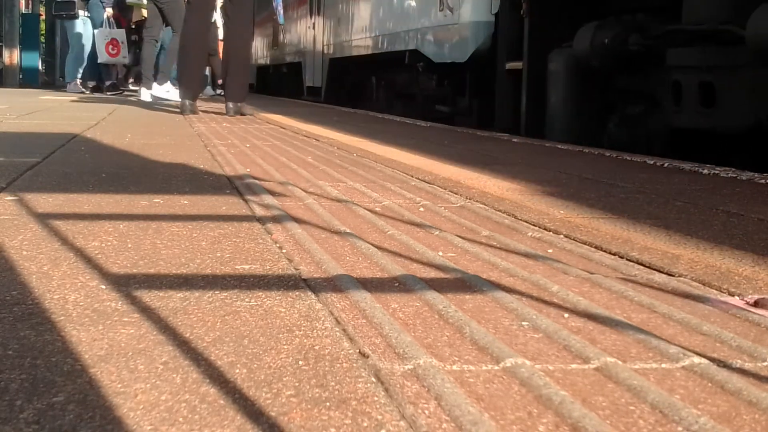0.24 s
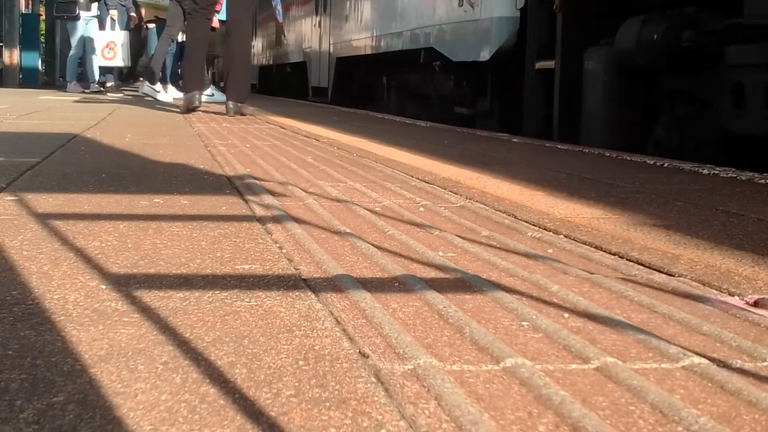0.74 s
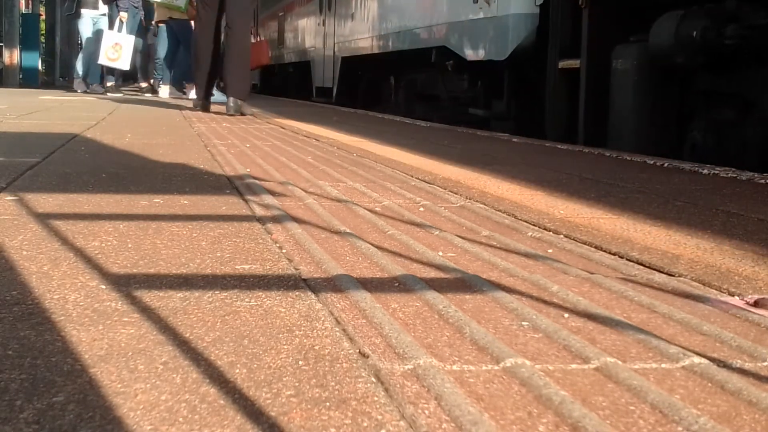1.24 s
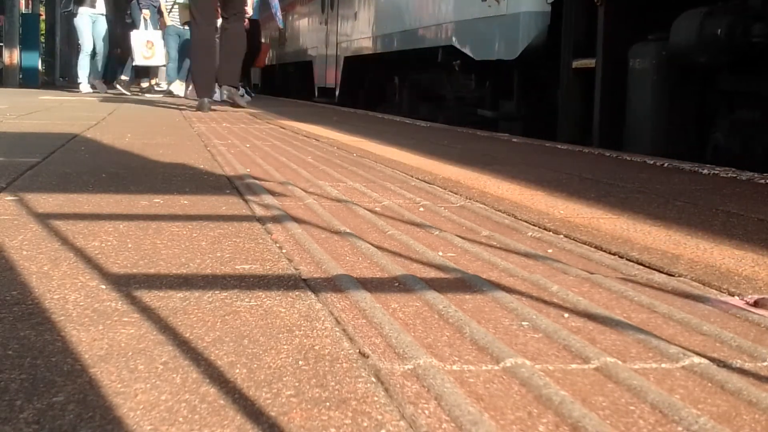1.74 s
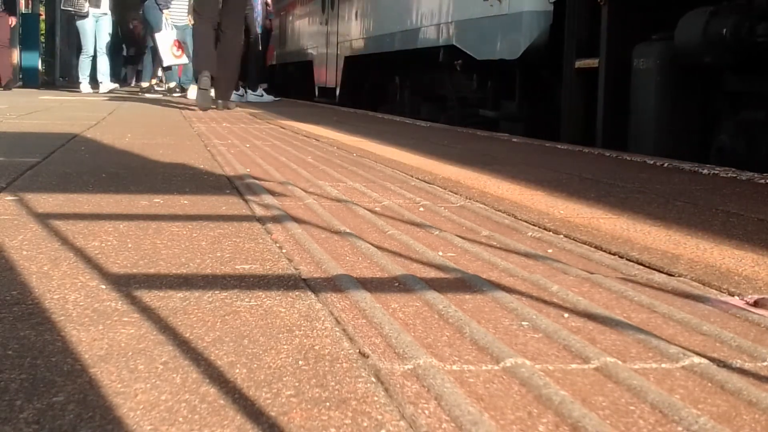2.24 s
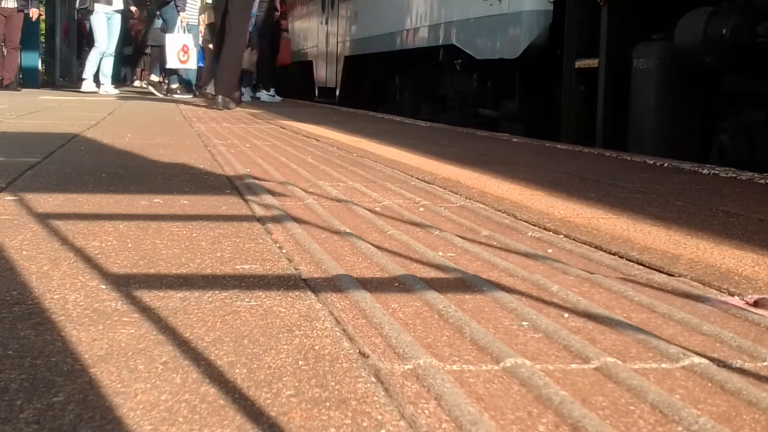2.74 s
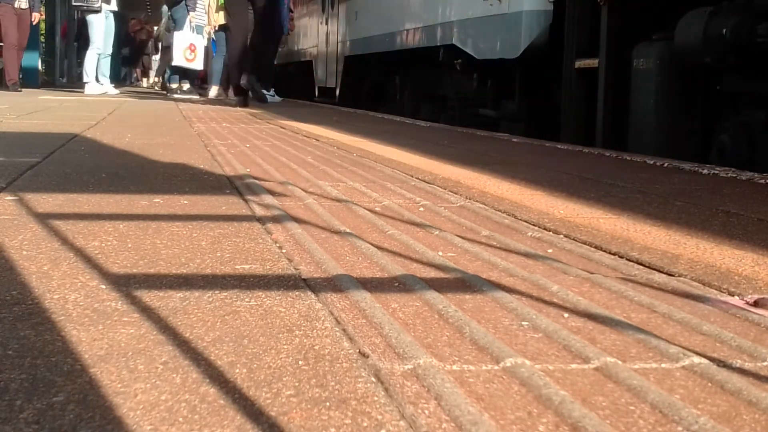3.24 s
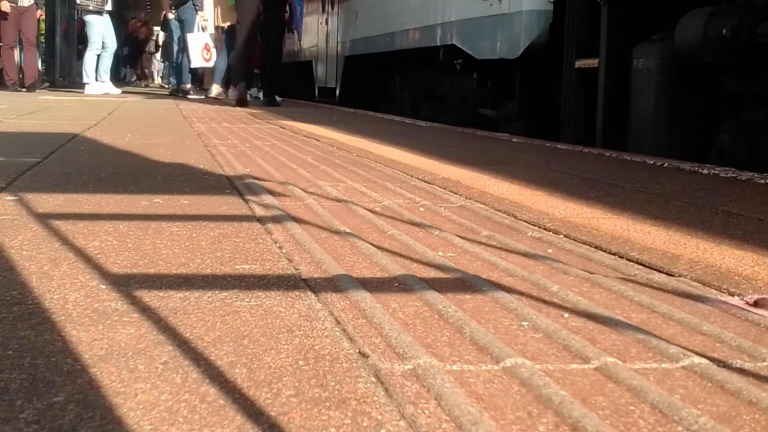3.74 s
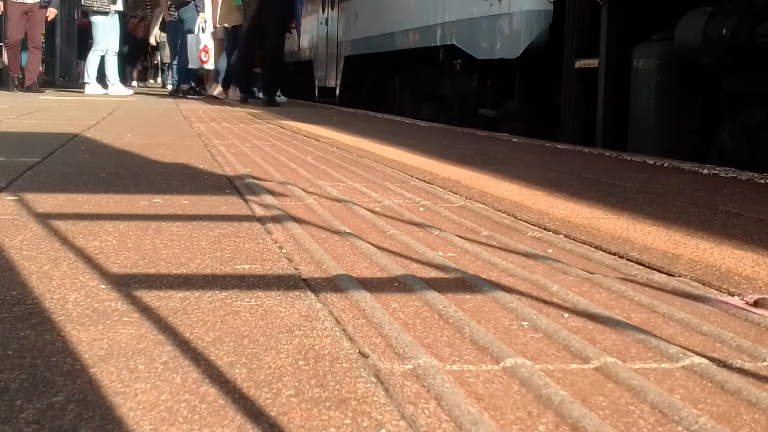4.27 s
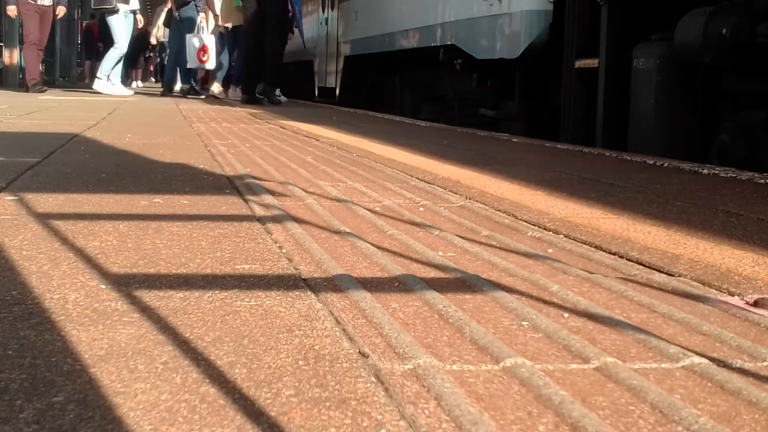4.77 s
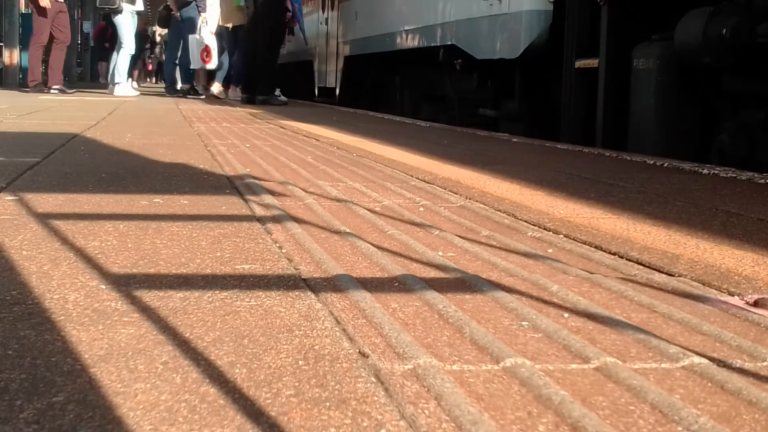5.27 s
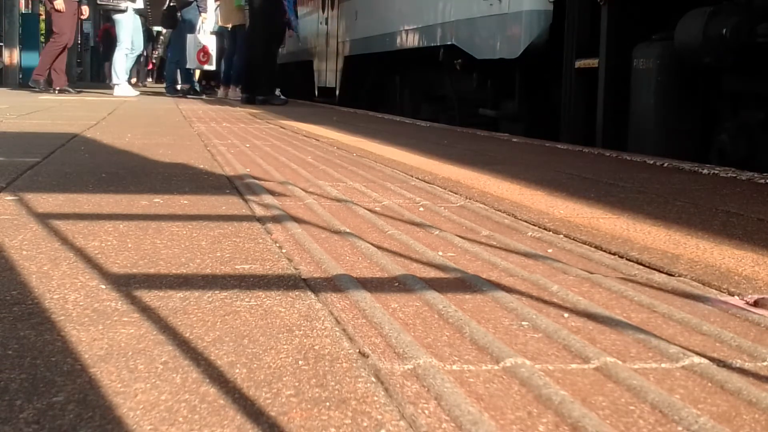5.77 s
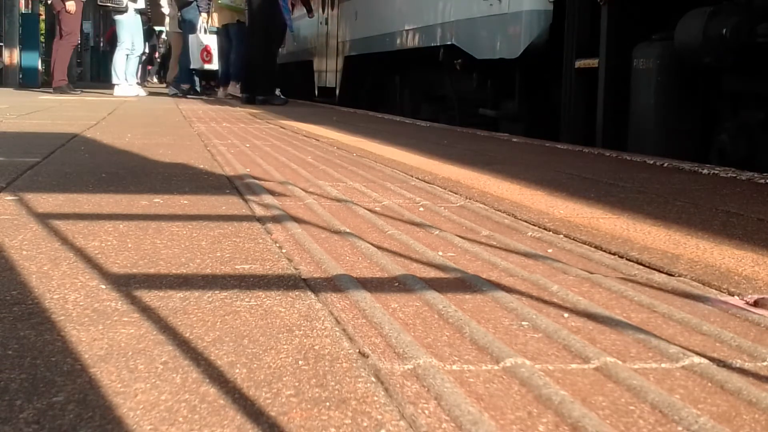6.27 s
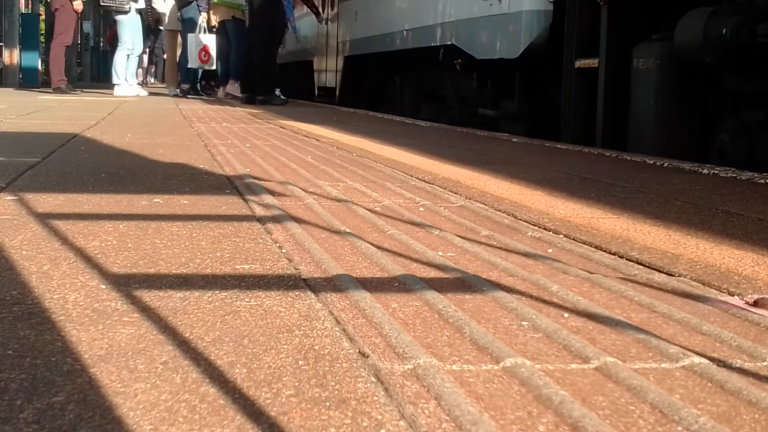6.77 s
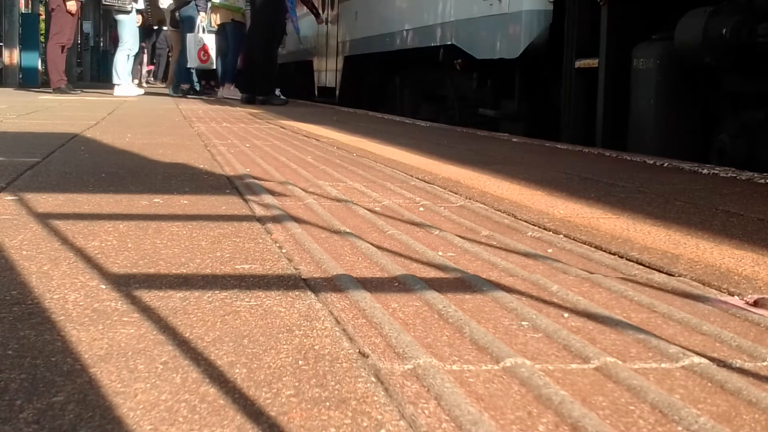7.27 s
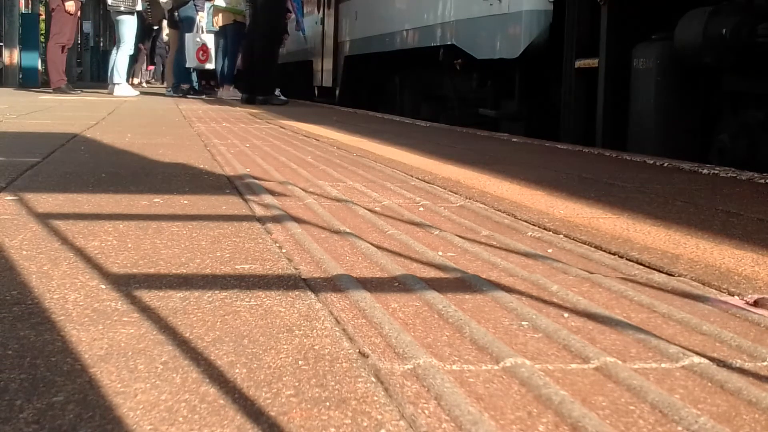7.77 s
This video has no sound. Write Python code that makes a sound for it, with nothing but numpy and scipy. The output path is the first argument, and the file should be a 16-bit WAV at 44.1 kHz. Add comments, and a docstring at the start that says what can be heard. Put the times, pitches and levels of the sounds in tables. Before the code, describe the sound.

Small dry rubs, chirps and low hoots open over the dulled idle of a diesel engine beside a platform. The mechanical rattle opens up, a few last squeaks pass, then the engine swells into a dense, steady roar with low throb, constant whine, metallic clatter, wavering panel buzz and thin leaking-air hiss. No footsteps stand out. The microphone stays still near the ground, and the engine drone runs on to the end.

```python
"""Short squeaks and scuffs come first, over the muffled idle of a diesel train at a station platform.
One shaft angle paces the exhaust throb, the rattle and the fan: sines and repeating noise locked to it.
The rattle clears after about a second; the sound grows louder after two seconds and stays loud.
Loose panels buzz in turn as wavering tones; leaking air hisses and whistles as shaped noise."""
import sys
import numpy as np
from scipy.fft import rfft, irfft, next_fast_len
from scipy.io import wavfile
from scipy.ndimage import map_coordinates

SR = 44100
rng = np.random.default_rng(int(sys.argv[2]) if len(sys.argv) > 2 else 0)


def unload_wav(signal):
    """Save mono or channel-first audio to the path in sys.argv[1] as 16-bit WAV at rate SR, clipped to [-1, 1]."""
    wavfile.write(
        sys.argv[1],
        SR,
        np.round(np.clip(np.atleast_2d(signal).T, -1, 1) * 32767).astype(np.int16),
    )


N = 353241  # length in samples
TOP_HZ = 15750  # nothing sounds above this
BLADE_ORDER = 79  # cycles of fan whine in one shaft turn


def amp(db):
    """Turn dB into a gain."""
    return 10 ** (np.asarray(db) / 20)


def unit(x):
    """Scale to rms 1."""
    return x / np.sqrt(np.mean(x ** 2) + 1e-20)


def along(points, hz):
    """Read a value between (Hz, value) points on a log frequency axis."""
    point_hz, value = np.transpose(points)
    return np.interp(np.log(hz + 1), np.log(point_hz + 1), value)


def curve(rows):
    """Join (seconds, value) points into one value per sample."""
    s, value = np.transpose(rows)
    return np.interp(np.arange(N) / SR, s, value)


def swells(rows):
    """Smooth rises and dips, each (middle s, length s, dB), as one level curve in dB."""
    t = np.arange(N) / SR
    return sum(db * np.exp(-(2 * (t - s) / length) ** 2) for s, length, db in rows)


def ramp(at_s, length_s):
    """A smooth step from 0 to 1 around at_s."""
    return .5 + .5 * np.tanh(2 * (np.arange(N) / SR - at_s) / length_s)


def wobble(rate):
    """A smooth random curve through this many random values a second."""
    knots = rng.standard_normal(int(N * rate / SR) + 4)
    return map_coordinates(knots, [np.arange(N) * rate / SR])


def filtered(x, response):
    """Weight each frequency of x by a response."""
    m = next_fast_len(N + SR // 2)
    return irfft(rfft(x, m) * response(np.fft.rfftfreq(m, 1 / SR)), m)[:N]


def noise(spectrum):
    """Steady noise with the given dB per Hz."""
    return filtered(rng.standard_normal(N), lambda hz: amp(along(spectrum, hz)) * np.sqrt(SR / 2))


def narrow(centre_hz, width_hz, size=N):
    """Noise of rms 1 through one resonance; width_hz is its half width."""
    m = next_fast_len(size)
    peak = 1 / (1 + ((np.fft.rfftfreq(m, 1 / SR) - centre_hz) / width_hz) ** 2)
    return unit(irfft(rfft(rng.standard_normal(m)) * peak, m)[:size])


def accent(turns, place, width, db):
    """A gain of rms 1 that rises once in each turn; place and width are parts of a turn."""
    away = (turns - place + .5) % 1 - .5
    return unit(amp(db * np.exp(-(2 * away / width) ** 2)))


def beats(turns, depth, orders):
    """Loudness pulsing of rms 1 at some multiples of the shaft speed."""
    pulses = sum(np.cos(2 * np.pi * (k * turns + rng.random())) for k in orders)
    return unit(np.exp(depth * pulses))


def lines(orders, turns, drift_db, slip=0):
    """Sines locked to the shaft, drifting slowly in level and slipping in phase by parts of a cycle."""
    def drift(row):
        return np.interp(np.arange(N), np.linspace(0, N, len(row)), row)

    out = np.zeros(N)
    for order, db in orders:
        level, play = rng.standard_normal((2, 20))
        cycles = order * turns + drift(slip * play) + rng.random()
        out += drift(amp(db + drift_db * level)) * np.sin(2 * np.pi * cycles)
    return np.sqrt(2) * out


def repeating(spectrum, turns, scatter_db, size=32768):
    """A rattle that comes back alike on every shaft turn: a dense comb of uneven lines."""
    shaft_hz = turns[-1] * SR / N
    hz = np.arange(size // 2 + 1) * shaft_hz
    uneven = unit(amp(scatter_db * rng.standard_normal(len(hz))))
    strength = amp(along(spectrum, hz)) * uneven * (hz < TOP_HZ)
    random_phase = np.exp(2j * np.pi * rng.random(len(hz)))
    cycle = irfft(strength * random_phase) * size * np.sqrt(shaft_hz / 2)
    return np.interp(turns % 1 * size, np.arange(size), cycle)


def running(spectrum, turns, alike, scatter_db):
    """Machine noise: the share alike (0-1) repeats with each turn, the rest is turbulence."""
    repeated = np.sqrt(alike) * repeating(spectrum, turns, scatter_db)
    return repeated + np.sqrt(1 - alike) * noise(spectrum)


def burst(length, fade_db):
    """A quick start, a steady fade and a short release."""
    t = np.arange(int((length + .02) * SR)) / SR
    start = np.clip(t / .005, 0, 1)
    release = np.clip((length - t) / .03 + .5, 0, 1)
    return start * release * amp(-fade_db * t / length)


def add(out, s, sound):
    """Mix a short sound into out at s seconds."""
    out[max(0, round(s * SR)):][:len(sound)] += sound


# Rubs, puffs and longer faint bands of noise. Each row: start in seconds, length in seconds,
# centre in Hz, half width in Hz, level in dB, fade over the length in dB.
SCUFF_EVENTS = [(.002, .06, 3880, 300, -39, 1), (.072, .042, 3920, 300, -37.5, 0),
                (.142, .098, 3860, 300, -37.5, 0), (.245, .042, 3920, 260, -36.5, 1),
                (.005, .11, 2420, 220, -35.5, 1), (.15, .135, 2440, 220, -35.5, 1),
                (.011, .6, 10750, 450, -39.5, 3), (.002, .9, 13500, 1800, -48, 5),
                (.005, .55, 1150, 200, -36, 3), (.6, .035, 11200, 1300, -29, 0),
                (.62, .06, 10300, 1100, -29, 2), (.67, .17, 10400, 1800, -35, 12),
                (.612, .12, 6300, 1400, -42, 5), (1.08, .16, 2000, 130, -37, 1),
                (1.3, .1, 2220, 110, -32, 4), (1.05, 1.4, 4250, 250, -46, 0)]


def scuffs():
    """Bursts and longer bands of narrow noise, made grainy by fast random level changes."""
    out = np.zeros(N)
    for s, length, hz, width, db, fade in SCUFF_EVENTS:
        shape = burst(length, fade)
        add(out, s, amp(db) * shape * narrow(hz, width, size=len(shape)))
    grain = unit(amp(1.8 * wobble(300)))
    return out * grain


# Squeaks, hoots and brief ringing tones. Each row: start in seconds, length in seconds, pitch in Hz,
# bend in Hz, random waver in Hz, level in dB, fade over the length in dB.
SQUEAK_EVENTS = [(.02, .045, 1390, 0, 10, -33, 2), (.092, .02, 3720, 60, 40, -40, 2),
                 (.2, .025, 2580, 0, 30, -37, 2), (.09, .06, 10950, 0, 110, -37, 1),
                 (.22, .03, 10900, 0, 110, -35, 1), (.31, .27, 10950, 0, 110, -39, 4),
                 (.745, .05, 668, 6, 6, -29, 0), (.78, .11, 778, 12, 6, -26, 11),
                 (.915, .08, 640, 0, 9, -33, 0), (1.0, .075, 646, -9, 3, -27, 0),
                 (1.085, .04, 638, -4, 4, -22, 2), (1.128, .04, 626, -6, 5, -28, 4),
                 (1.045, .055, 830, 8, 5, -35, 0), (1.08, .05, 1128, 0, 5, -34, 1),
                 (.2, .03, 7000, 0, 60, -49, 1), (.29, .04, 6900, 0, 60, -49, 1),
                 (1.0, .04, 6950, 0, 60, -49, 1), (1.17, .06, 6900, 0, 50, -46, 1),
                 (1.241, .026, 5665, -20, 36, -24.5, 3), (1.268, .04, 5665, 0, 45, -36, 6),
                 (1.314, .018, 5630, -15, 36, -28, 2), (1.34, .06, 5645, 0, 45, -41, 5),
                 (1.24, .075, 11330, -60, 120, -36, 9), (1.38, .36, 1125, 0, 4, -39, 1),
                 (1.655, .15, 9980, 0, 45, -34.5, 2), (1.845, .035, 9980, 0, 45, -38, 3),
                 (1.66, .08, 10730, 0, 45, -37.5, 2), (1.765, .07, 10730, 0, 50, -31.5, 1)]


def squeaks():
    """Brief sine tones, some bending, are unsteady in pitch and strength."""
    out = np.zeros(N)
    jitter = wobble(300)
    flutter = unit(amp(1.2 * wobble(45)))
    for s, length, hz, bend, waver, db, fade in SQUEAK_EVENTS:
        shape = burst(length, fade)
        jitter_here = jitter[round(s * SR):][:len(shape)]
        pitch = hz + np.linspace(0, bend, len(shape)) + waver * jitter_here
        tone = np.sqrt(2) * np.sin(2 * np.pi * np.cumsum(pitch) / SR)
        add(out, s, amp(db) * shape * tone)
    return flutter * out


# Colour of the leaking air's hiss. Each row: frequency in Hz, held level in dB per Hz.
AIR_SPECTRUM = [(3500, -100), (5300, -73.5), (6100, -84), (7000, -76), (7600, -70), (8500, -74),
                (9200, -73.5), (10200, -69.5), (11300, -74.5), (12200, -83.5), (12900, -83), (13500, -99),
                (15800, -98)]


def air(turns, hiss_db, whistle_db):
    """Leaking air hisses as broad noise and whistles as two narrow resonances, shaken by the engine."""
    shaking = beats(turns, depth=.07, orders=(1, 6, 9))
    hiss = amp(hiss_db + 1.25 * wobble(30)) * noise(AIR_SPECTRUM)
    tones = narrow(7962, 114) + amp(-4.0) * narrow(8004, 6.9)
    whistle = amp(whistle_db + 0.9 * wobble(4.6)) * tones
    return (hiss + whistle) * shaking


PANELS_DB = -1  # gain on all panels together
# Loose panels. Each row: middle in seconds, length in seconds, pitch in Hz, random waver in Hz,
# level in dB before PANELS_DB, place of the pulse in the turn (0-1), pulse height in dB.
PANEL_BUZZES = [(2.15, .8, 1729, 5, -34, .27, 5), (2.25, .5, 1665, 12, -38, .27, 5),
                (2.2, .55, 1515, 12, -34.5, .27, 6), (2.1, 1.1, 2001, 8, -33.5, .27, 6),
                (2.3, 1.0, 2215, 35, -35.5, .25, 7), (2.3, .3, 1940, 50, -34.5, .27, 5),
                (3.7, 1.6, 1765, 7, -38.5, .75, 5), (4.8, 2.2, 2148, 8, -37.5, .35, 8),
                (4.3, 4.6, 1927, 1.5, -36, .25, 4), (5.8, 4.5, 2664, .7, -39, .25, 2),
                (5.1, 1.2, 2240, 8, -39.5, .25, 8), (7.55, .8, 2950, 45, -37, .95, 5)]


def panels(turns):
    """Each panel's buzz builds and dies away, wavering in pitch and shaken once a turn."""
    t, out = np.arange(N) / SR, np.zeros(N)
    for s, length, hz, waver, db, place, pulse_db in PANEL_BUZZES:
        shape = np.exp(-(1.8 * np.abs(t - s) / length) ** 3)
        pitch = hz + waver * wobble(4 * waver)  # a wider waver also changes faster
        tone = np.sin(2 * np.pi * np.cumsum(pitch) / SR)
        out += amp(db) * shape * accent(turns, place, width=.45, db=pulse_db) * tone
    return np.sqrt(2) * amp(PANELS_DB) * out


# Resonances of the engine's covers. Each row: pitch in Hz, half width in Hz,
# middle level in dB against the rattle.
COVER_RESONANCES = [(1950, 45, -0.5), (2120, 65, -8), (2365, 45, -2), (2715, 54, 0.5), (2983, 49, -4),
                    (3380, 79, 0), (3800, 40, -0.5), (4210, 100, -10), (5310, 60, -6), (5730, 37, 1)]


def covers(rattle):
    """The rattle rings each cover, more or less strongly from moment to moment."""
    out = np.zeros(N)
    for centre, width, db in COVER_RESONANCES:
        ring = filtered(rattle, lambda hz: 1 / (1 + ((hz - centre) / width) ** 2))
        out += amp(db + 2.6 * wobble(11)) * ring
    return out


# Colour of the block's rattle. Each row: frequency in Hz, held level in dB per Hz.
BLOCK_SPECTRUM = [(700, -81), (1300, -65), (1700, -64), (2200, -62), (2530, -69), (2900, -63), (3200, -69),
                  (3800, -70), (4600, -75), (5400, -79), (6100, -77), (7500, -80.5), (12000, -105)]
# Gear and injector tones. Each row: cycles per shaft turn, held level in dB (rms).
GEAR_LINES = [(100.8, -43), (111, -43), (132, -44.5), (167, -47), (172, -46), (176, -44), (183, -42.5),
              (212, -45), (226, -44), (228, -41), (237, -43.5), (244, -45), (248, -45), (264, -43),
              (275.5, -48), (288.5, -40), (312, -47), (315, -46), (323, -45), (361, -53), (403, -51.5),
              (554.5, -59), (564, -54.5), (609, -60)]
MUFFLED_DB, GEARS_MUFFLED_DB = -6.5, -5.5  # gains on the rattle and the gears while muffled
CLEAR_S, CLEARING_S = .99, .16  # when they clear, and how long that takes, in seconds


def clatter(turns, clatter_db):
    """Valves, injectors and gears rattle the block, with one harder knock a turn; muffled at first."""
    muffled = 1 - ramp(CLEAR_S, CLEARING_S)
    knock = accent(turns, place=.24, width=.05, db=3)
    pulsing = beats(turns, depth=.08, orders=(2, 6, 9, 11)) * knock
    rattle = running(BLOCK_SPECTRUM, turns, alike=.7, scatter_db=2.5) * pulsing
    gears = lines(GEAR_LINES, turns, drift_db=1.5, slip=.06)
    block = amp(MUFFLED_DB * muffled) * (rattle + covers(rattle))
    return amp(clatter_db + 0.63 * wobble(13)) * (block + amp(GEARS_MUFFLED_DB * muffled) * gears)


FIRING_ORDER = 9  # cycles per shaft turn of the main exhaust line
# Lowest exhaust tones. Each row: cycles per shaft turn, held level in dB.
THROB_LINES = [(6, -51), (7, -47), (8, -46), (9, -35), (10, -50), (11, -45), (12, -51), (13, -44),
               (14, -54), (15, -53)]


def throb(turns):
    """Uneven firing swings the main line's phase: neighbours pair up, so loudness stays nearly even."""
    offset = rng.random(len(THROB_LINES))
    out = np.zeros(N)
    for order, db in THROB_LINES:
        step = round(order) - FIRING_ORDER
        phase = np.sign(step) * offset[abs(step)] + .39 * (step < 0)  # in cycles
        out += amp(db) * np.sin(2 * np.pi * (order * turns + phase))
    return np.sqrt(2) * out


# Colours of the low rumble and of the exhaust roar. Each row: frequency in Hz, held level in dB per Hz.
RUMBLE_SPECTRUM = [(15, -90), (45, -91), (85, -61.5), (130, -69), (165, -103), (300, -110)]
EXHAUST_SPECTRUM = [(150, -100), (175, -70.5), (235, -58), (320, -51.5), (400, -52), (750, -52),
                    (950, -57.5), (1350, -57.5), (1700, -60), (2300, -67), (4000, -127)]
# Humming tones of silencer and auxiliaries. Each row: cycles per shaft turn, held level in dB.
PIPE_LINES = [(24.3, -44), (30, -44), (31.7, -37), (34, -37), (35, -36), (36, -39), (39, -42), (40, -40),
              (44, -39), (49, -39.5), (50, -40), (54, -40), (61, -39), (62, -39), (80, -38), (85, -40)]


def exhaust(turns, throb_db, exhaust_db):
    """A clean low throb lies under the pulsing roar and hum of the silencer, which chuffs once a turn."""
    pulsing = beats(turns, depth=.13, orders=(5, 18))
    roar = running(EXHAUST_SPECTRUM, turns, alike=0.27, scatter_db=2.9) * pulsing
    hum = lines(PIPE_LINES, turns, drift_db=0.2)
    chuff = accent(turns, place=.82, width=.15, db=3.2)
    low = amp(throb_db) * (throb(turns) + noise(RUMBLE_SPECTRUM))
    return low + amp(exhaust_db) * chuff * (roar + hum)


# Level of the fan whine. Each row: time in seconds, level in dB before wavers and surges.
FAN_LEVEL = [(0.0, -32), (0.06, -32.5), (.25, -26), (.3, -35), (.36, -28.5), (.55, -24.5), (.76, -26),
             (0.82, -22.5), (.89, -25), (.94, -29.5), (1.03, -31), (1.12, -42), (1.55, -41), (1.63, -28),
             (1.73, -27), (1.83, -22), (2.07, -21.5), (2.13, -17.5), (2.32, -16), (3.48, -15.5),
             (3.5, -16.5), (6.89, -16), (7.6, -20.5), (7.8, -18)]
# Brief wavers of the whine. Each row: middle in seconds, length in seconds, change in dB.
WHINE_WAVERS = [(1.885, .05, -1), (1.945, .04, 3), (2.18, .04, 0), (2.46, 0.071, -3.5), (2.6, .3, 0),
                (3.65, 0.062, 2.5), (4.53, 0.15, -2), (5.99, .08, 1.5), (6.92, .1, 1.7), (7.14, .05, 1.5),
                (7.255, 0.033, 4), (7.31, .05, -1), (7.357, 0.026, 5), (7.41, .06, -2.5), (7.465, 0.029, 4),
                (7.55, .08, 1.5), (7.77, 0.05, 3), (7.88, 0.093, -1)]
# Late on the octave loses most of its pulsing: when and how quickly in seconds, and what share.
OCTAVE_STEADIES_S, STEADYING_S, STEADY_SHARE = 6.9, .3, .75


def fan(turns, octave_db):
    """An engine-driven fan sounds its blade tone, fluttering with the shaft, and a weak, pulsing octave."""
    phase = 2 * np.pi * BLADE_ORDER * turns + 0.035 * wobble(28)
    flutter = beats(turns, depth=0.035, orders=(1, 2))
    blade_db = curve(FAN_LEVEL) + swells(WHINE_WAVERS) + 0.26 * wobble(20)
    blade = amp(blade_db) * np.sin(phase) * flutter
    depth = 1 - STEADY_SHARE * ramp(OCTAVE_STEADIES_S, STEADYING_S)
    pulsing = accent(turns, place=.02, width=.55, db=14) ** depth * amp(1.3 * wobble(14))
    octave = amp(octave_db) * pulsing * np.sin(2 * phase + 0.7 * wobble(18))
    return np.sqrt(2) * (blade + octave)


# dB that each layer moves for one dB of the overall level
THROB_FOLLOWS, CLATTER_FOLLOWS, HISS_FOLLOWS, WHISTLE_FOLLOWS, OCTAVE_FOLLOWS = 0.79, 0.41, 0.59, 1, 1
# share of a surge in each layer; the clatter takes all of it
EXHAUST_SURGE, FAN_SURGE, HISS_SURGE = 0.76, 0.51, 1
WHISTLE_DB, OCTAVE_DB = -35.5, -36  # held levels of the leak whistle and the fan's octave
FLICKER_DB, FLICKER_PER_S = 0.51, 14  # small random surges: size, and random values a second
# Pitch of the fan whine, which sets the shaft speed. Each row: time in seconds, pitch in Hz.
WHINE_PITCH = [(0, 746), (2.0, 745.1), (3.2, 746), (6.7, 746.1), (7.4, 744.4), (8.0, 745.1)]
# Overall loudness, rising after two seconds. Each row: time in seconds, level in dB against the held level.
OVERALL_LEVEL = [(0, -6.5), (.6, -4), (1.7, -4.5), (2.05, -3.5), (2.25, -0.1), (3.3, 0), (4.3, 0.04),
                 (6.2, -0.54), (7.0, 0), (7.3, 1.5), (8.0, 0)]
# Brief surges and dips. Each row: middle in seconds, length in seconds, change in dB.
LEVEL_SURGES = [(1.535, 0.034, 2.5), (1.585, 0.045, -3), (1.635, 0.022, 0.5), (1.742, 0.02, -8),
                (1.82, 0.062, 3.5), (1.938, 0.023, 4.5), (2.14, 0.06, 1.5), (2.25, 0.07, 3),
                (2.36, 0.047, 2.5), (3.574, 0.075, -5), (3.97, 0.29, -1.7), (4.16, 0.11, 2.1),
                (6.153, 0.14, -1.5), (7.3, 0.092, 1.5)]
# Rises and dips of the fan's octave. Each row: middle in seconds, length in seconds, change in dB.
OCTAVE_RISES = [(.23, .1, 6), (.42, 0.061, 7), (.85, 0.029, 12), (.93, 0.068, 8), (1.3, 0.54, -7),
                (2.2, 0.34, 3), (7.6, 1.0, 5.5)]


def scene():
    """The shaft angle paces every machine; overall level and surges move the layers; squeaks lie on top."""
    turns = np.cumsum(curve(WHINE_PITCH)) / BLADE_ORDER / SR
    overall_db = curve(OVERALL_LEVEL)
    surge_db = swells(LEVEL_SURGES) + FLICKER_DB * wobble(FLICKER_PER_S)
    octave_db = OCTAVE_DB + OCTAVE_FOLLOWS * overall_db + swells(OCTAVE_RISES)
    hiss_db = HISS_FOLLOWS * overall_db + HISS_SURGE * surge_db
    leak = air(turns, hiss_db, WHISTLE_DB + WHISTLE_FOLLOWS * overall_db)
    rattling = clatter(turns, CLATTER_FOLLOWS * overall_db + surge_db)
    roaring = exhaust(turns, THROB_FOLLOWS * overall_db, overall_db + EXHAUST_SURGE * surge_db)
    whining = amp(FAN_SURGE * surge_db) * (fan(turns, octave_db) + panels(turns))
    return (scuffs() + squeaks() + leak + rattling + roaring + whining)[None]


def record(dry):
    """Remove everything from the band limit upwards."""
    return filtered(dry[0], lambda hz: hz < TOP_HZ)[None]


dry = scene()
out = record(dry)
unload_wav(out)
```